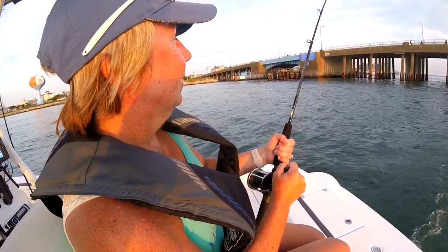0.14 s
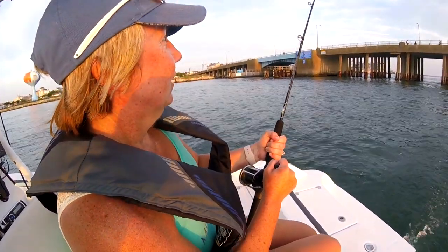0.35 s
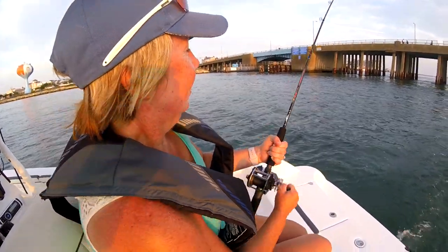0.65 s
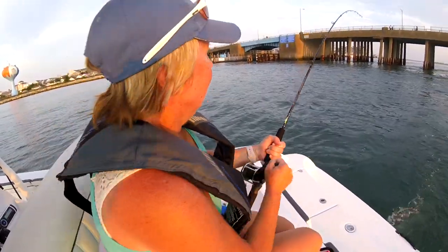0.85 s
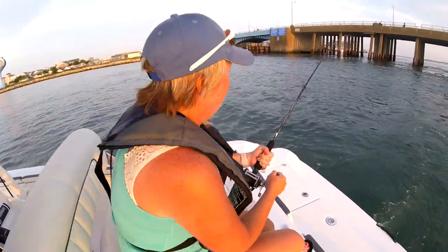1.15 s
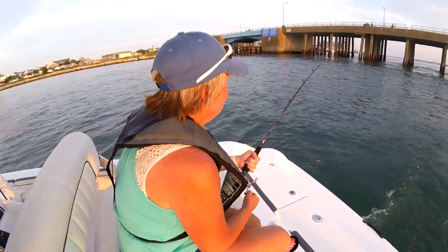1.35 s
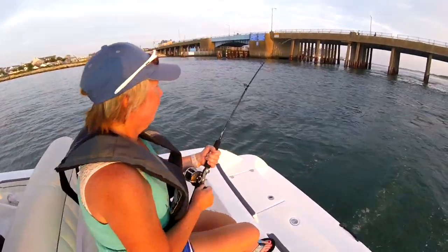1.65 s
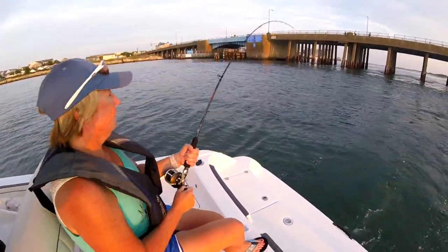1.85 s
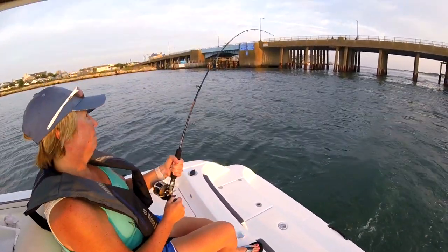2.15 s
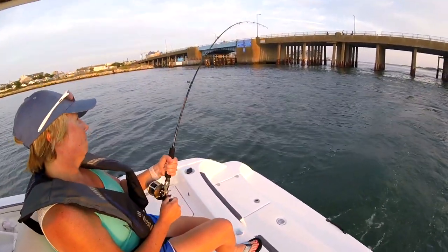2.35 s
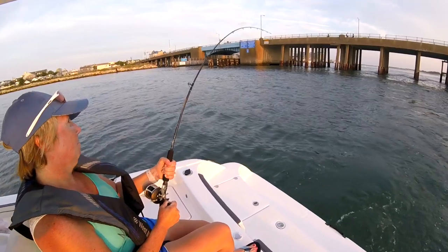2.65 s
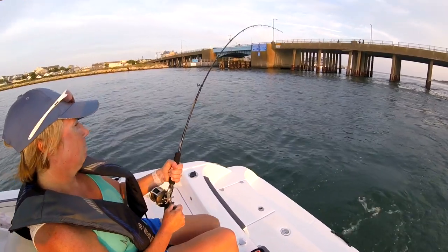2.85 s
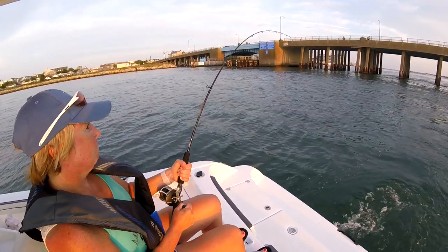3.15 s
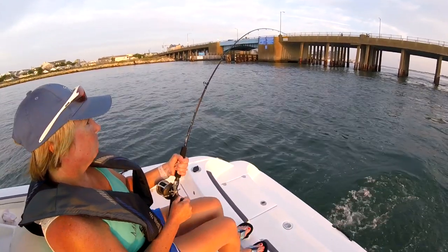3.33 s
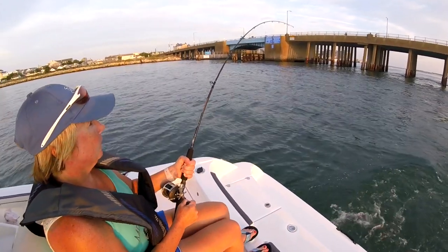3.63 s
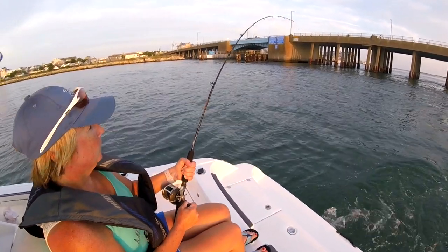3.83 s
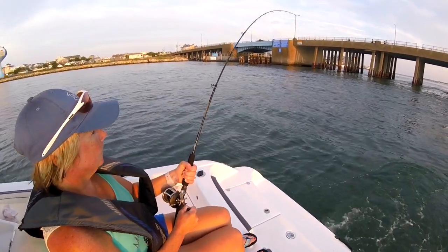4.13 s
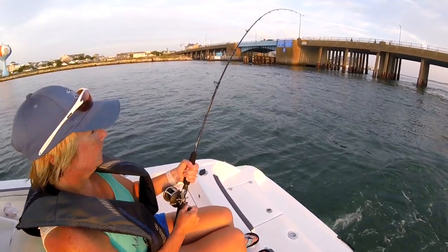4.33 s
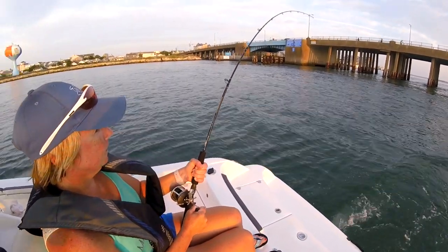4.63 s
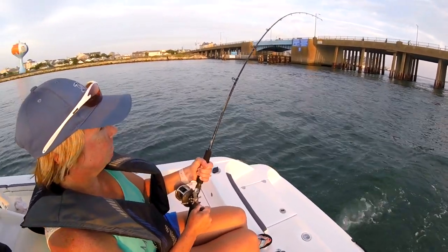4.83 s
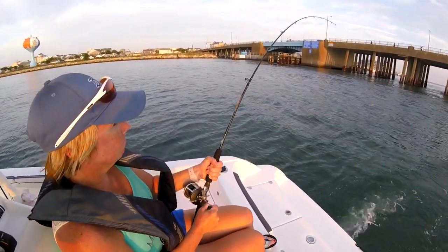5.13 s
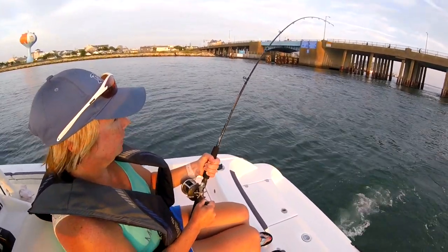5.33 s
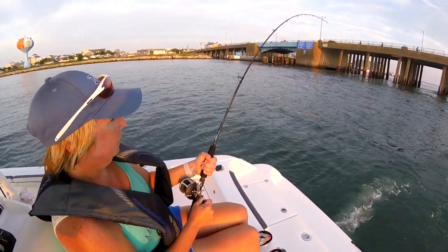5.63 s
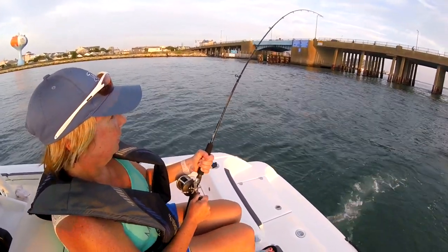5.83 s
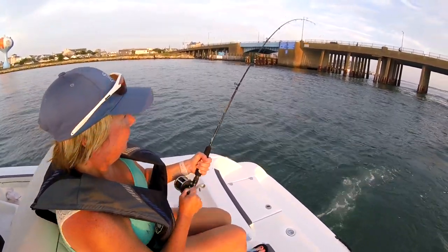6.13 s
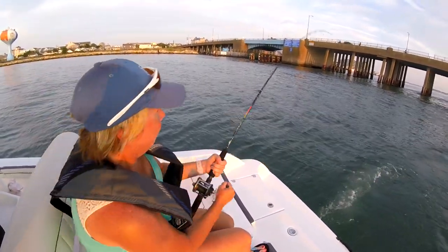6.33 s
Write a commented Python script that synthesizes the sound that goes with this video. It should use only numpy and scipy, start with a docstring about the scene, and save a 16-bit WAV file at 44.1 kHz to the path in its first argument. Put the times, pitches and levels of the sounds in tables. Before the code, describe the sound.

A steady, deep motor drone dominates, fluttering slightly in pitch, with throaty wet gulps. Hollow plops and ticks cluster around the first second, a brief thin chirp follows, then bubbly plops lead into a brighter wash just after three seconds. Lighter lapping and scattered ticks continue to the end. The sound is outdoors, close and dry, with soft low wind and faint hiss.

```python
"""An outboard engine idles on a small fishing boat in a bay: firing harmonics, a burbling exhaust, a faint gear whirr.
A second low tone sounds beside its hum. Waves run along the hull: filtered noise and damped bubble rings build to
each crest of wash and spray and drain away, with plops of rising pitch and small splashes of clumped droplets.
Low-passed noise is a little wind over a thin hiss; noise bursts are sharp ticks, and gliding partials one short chirp.
The microphone port adds resonances to the treble of spray, ticks and hiss."""
import sys
import numpy as np
from scipy import signal
from scipy.fft import rfft, irfft, next_fast_len
from scipy.io import wavfile
from scipy.ndimage import map_coordinates

SR = 44100
rng = np.random.default_rng(int(sys.argv[2]) if len(sys.argv) > 2 else 0)


def unload_wav(signal):
    """Save mono or channel-first audio to the path in sys.argv[1] as 16-bit WAV at rate SR, clipped to [-1, 1]."""
    wavfile.write(
        sys.argv[1],
        SR,
        np.round(np.clip(np.atleast_2d(signal).T, -1, 1) * 32767).astype(np.int16),
    )


N = 285768

# spectral envelope of the ticks and of single drops: f/Hz, gain/dB
TICK_COLOUR = [(800, -26), (2800, 2.5), (4500, 0), (6200, 4), (7800, -12.5), (10000, -7.5), (15000, -19.5)]


def amp(db):
    """Amplitude ratio: 20 dB is a factor of ten."""
    return 10 ** (np.asarray(db) / 20)


def unit(x):
    """Normalisation: equal mean power, rms 1."""
    return x / np.sqrt(np.mean(x ** 2) + 1e-20)


def curves(rows):
    """Linear interpolation: one value per sample for each column after the time."""
    s, *cols = np.transpose(rows)
    return [np.interp(np.arange(N) / SR, s, c) for c in cols]


def wobble(rate):
    """Band-limited fluctuation: a smooth curve through random knots, rate knots a second."""
    knots = rng.standard_normal(4096)
    return map_coordinates(knots, [np.arange(N) * rate / SR + 2], mode="wrap")


def filtered(x, response):
    """Linear filtering: the spectrum of x times a response of frequency."""
    size = next_fast_len(N + SR // 2)
    hz = np.fft.rfftfreq(size, 1 / SR)
    return irfft(rfft(x, size) * response(hz), size)[:N]


def coloured(x, points):
    """Minimum-phase filtering: a causal filter whose gain follows the (Hz, dB) points."""
    f, db = np.transpose(points)

    def response(hz):
        gain = amp(np.interp(np.log(hz + 1), np.log(f), db))
        cepstrum = irfft(np.log(gain))
        half = len(cepstrum) // 2
        # folding the cepstrum onto positive time makes the filter causal
        folded = np.r_[cepstrum[0], 2 * cepstrum[1:half], np.zeros(half)]
        return np.exp(rfft(folded))
    return filtered(x, response)


def resonance(hz, centre, width):
    """Damped oscillator: one mode with gain 1 at its centre, both arguments in Hz."""
    return 1j * hz * width / (centre ** 2 - hz ** 2 + 1j * hz * width)


def noise():
    """White noise: equal power at all frequencies."""
    return rng.standard_normal(N)


def add(track, s, sound):
    """Superposition: mix a sound in at s seconds."""
    part = track[max(round(s * SR), 0):][:len(sound)]
    part += sound[:len(part)]


def port(x):
    """Port resonance: the microphone port lifts narrow bands of the treble."""
    # modes added to the direct sound: f/Hz, width/Hz, level/dB
    port_modes = [(6430, 360, 9), (9530, 360, 0.5)]

    def response(hz):
        return 1 + sum(amp(db) * resonance(hz, centre, width) for centre, width, db in port_modes)
    return filtered(x, response)


def engine():
    """Harmonic series of the firing rate, with modulated noise for the wet exhaust and a gear resonance."""
    # engine speed: t/s, firing rate/Hz
    speed = [(0.1, 43.3), (0.74, 43.3), (0.84, 43.9), (1.09, 41.7), (1.25, 41.3), (1.6, 43.7), (2.15, 43.8),
             (2.42, 42.8), (2.73, 42.7), (3.16, 45.0), (3.74, 42.4), (4.7, 44.3), (4.82, 44.0), (5.1, 42.7),
             (5.49, 43.3), (5.6, 44.2), (6.09, 43.0), (6.45, 43.6)]
    # hum at twice the firing rate, before trim and flutter: t/s, level/dB
    hum_levels = [(0, -31.5), (0.47, -25), (0.7, -30), (1.27, -36), (1.45, -26), (2.05, -30), (2.7, -29.5),
                  (3.08, -27), (3.22, -33), (3.9, -31.5), (4.7, -29.5), (6.05, -31), (6.38, -27.5)]
    # exhaust burble as the outlet rides higher or lower, before trim and surges: t/s, level/dB
    exhaust = [(0, -32.3), (0.4, -33), (1.0, -35), (1.6, -33.5), (2.0, -34), (2.7, -35.5), (3.2, -32.5),
               (3.7, -35.5), (4.35, -33), (5.05, -34.5), (6.02, -34), (6.38, -32)]
    # orders relative to one another: multiple of the firing rate, level/dB
    order_levels = [(1, -16), (3, -2.5), (4, -10.5), (5, -9.5), (6, -7.5), (7, -26.5)]
    # response of the exhaust leg and hull: f/Hz, gain/dB
    hull = [(60, -27), (100, 0), (150, 0.5), (195, -4), (220, 1), (242, -6.5), (268, 0), (310, -7.5),
            (380, -11.5), (490, -12.5), (600, -21.5), (1200, -31), (3000, -80)]
    orders_db, orders_growth = -0.07, 2.1  # the upper orders against the burble; they swing wider than it
    surge_db = 0.8  # depth of the quick random surges of the burble
    glug_hz, glug_width_hz = 346, 225  # throaty gulps of the wet outlet
    glug_db, glug_swing_db = -17, 4  # their level against the burble, and depth of its random swing

    firing_hz, = curves(speed)
    hum_db, = curves(hum_levels)
    burble_db, = curves(exhaust)
    phase = 2 * np.pi * np.cumsum(firing_hz) / SR
    hum = amp(hum_db + 0.13 + 0.95 * wobble(16)) * unit(np.sin(2 * phase))

    # water over the outlet makes each order waver by itself, the phase of the high ones most
    orders = np.zeros(N)
    for k, db in order_levels:
        flutter = amp(db + 3.24 * wobble(15))
        jitter = rng.uniform(0, 2 * np.pi) + 0.094 * k * wobble(18)
        orders += flutter * unit(np.sin(k * phase + jitter))
    mean_db = burble_db.mean()
    orders_gain = amp(orders_db + mean_db + orders_growth * (burble_db - mean_db))

    # the half-rate term makes alternate puffs unequal
    puffs = np.exp(0.094 * np.cos(phase) + 0.087 * np.cos(phase / 2))
    burble = amp(0.12 + surge_db * wobble(12)) * unit(coloured(puffs * noise(), hull))
    gulps = filtered(puffs * noise(), lambda hz: resonance(hz, glug_hz, glug_width_hz) ** 2)
    glugs = amp(glug_db + glug_swing_db * wobble(22)) * unit(gulps)
    shaken = noise() * (1 + 0.3 * np.cos(phase))
    gears = amp(-53.0 + 0.33 * wobble(4.03)) * unit(filtered(shaken, lambda hz: resonance(hz, 904, 96) ** 2))
    return hum + orders_gain * orders + amp(burble_db) * (burble + glugs) + gears


def drone():
    """Phase-modulated sinusoid: a second low tone swells beside the hum for a while."""
    # t/s, level/dB
    level_db, = curves([(0, -41), (.8, -51), (1.1, -35), (2.1, -46.5), (2.6, -48.5), (6.48, -52)])
    phase = 2 * np.pi * 148.5 * np.arange(N) / SR + 0.34 * wobble(5.5)
    return amp(level_db) * unit(np.sin(phase))


def swell():
    """Power addition of waves: wash and spray gains build to each crest, then drain away exponentially."""
    # waves along the hull, before trims: crest t/s, spray level/dB, wash level/dB, rise/s, fade/(dB/s)
    waves = [(0.05, -51, -48.5, 0.17, 24), (0.72, -52.5, -53, 0.24, 9), (2.55, -61.5, -52, 0.19, 1),
             (3.1, -46, -45.5, 0.16, 8.5), (3.27, -51.5, -48.5, 0.08, 10.5), (4.55, -51.5, -49, 0.055, 9.5),
             (5.0, -51.5, -55.5, 0.1, 6), (5.28, -52.5, -49, 0.033, 18), (5.56, -51, -60, 0.034, 24)]
    t = np.arange(N) / SR
    wash, spray = amp(-48), amp(-58)  # the water between waves
    for s, spray_db, wash_db, rise, fade in waves:
        build = np.exp(-(np.minimum(t - s, 0) / rise) ** 2 / 2)
        shape = build * amp(-fade * np.maximum(t - s, 0))
        wash = np.hypot(wash, amp(wash_db) * shape)
        spray = np.hypot(spray, amp(spray_db) * shape)
    return wash, spray


def bubbles(count, centre_hz, spread, cycles, size_db):
    """Bubble resonance: a cloud of small damped, slightly rising rings, rms 1."""
    when, size = rng.random((2, count))
    hz = centre_hz * np.exp(spread * rng.standard_normal((count, 1)))
    hz = np.clip(hz, 200, 14000)
    turns = hz * np.arange(768) / SR
    age = turns / cycles  # each ring falls by a factor e in this many cycles
    rings = np.sin(2 * np.pi * turns * (1 + 0.039 * np.minimum(age, 4))) * np.exp(-age)
    gain = amp(size_db * np.minimum(-np.log(1 - size), 5))
    at = (when * N).astype(int)[:, None] + np.arange(rings.shape[1])
    cloud = np.bincount(at.ravel(), (gain[:, None] * rings).ravel(), N)[:N]
    return unit(cloud)


def patter(rate, size_db):
    """Poisson impacts: tiny clicks of uneven size at random moments, rate a second, rms 1."""
    size = amp(size_db * np.clip(noise(), -2, 2))
    return unit((rng.random(N) < rate / SR) * size * np.sign(noise()))


def spatter():
    """Impulsive excitation: single drops land at random, each a faint bright tick, rms 1."""
    t = np.arange(SR // 50) / SR
    decay = amp(-60 * t / 0.022)
    hits = np.abs(patter(rate=40, size_db=5))
    bursts = signal.fftconvolve(hits, decay)[:N]
    return unit(port(coloured(bursts * noise(), TICK_COLOUR)))


def water():
    """Bubble and droplet noise: each wave lifts a gurgling wash and a spray of rings, bursts and crisp drops."""
    # spectral envelope of the wash: f/Hz, gain/dB
    wash_colour = [(200, -21.5), (450, -4), (620, -2), (800, -0.5), (1000, -3), (1400, -4.5), (1900, -9.5),
                   (2800, -14), (5000, -31.5), (16000, -58)]
    # spectral envelope of the spray: f/Hz, gain/dB
    spray_colour = [(700, -18.5), (1600, -3), (2600, 1.5), (3800, -2), (4800, 0.5), (6300, -5),
                    (7500, -7.5), (10000, -13.5), (13500, -15.5), (16000, -15)]
    wash_gain, spray_gain = swell()
    gurgle = bubbles(count=3000, centre_hz=1102.0, spread=0.605, cycles=6.5, size_db=0.5)
    wash = unit(coloured(noise() + amp(-11.5) * gurgle, wash_colour))
    drops = bubbles(count=6000, centre_hz=3983, spread=0.643, cycles=5.0, size_db=2.0)
    bursts = patter(rate=410, size_db=3.5)
    fizz = (noise() + amp(0.5) * drops + amp(-2.0) * bursts) * amp(1.35 * wobble(110))
    spray = unit(port(coloured(fizz, spray_colour))) + amp(-9) * spatter()
    washing = wash_gain * amp(0.62 * wobble(24)) * wash
    spraying = spray_gain * amp(-1.0 + 0.79 * wobble(11)) * spray
    return washing + spraying


def air():
    """Turbulence noise: light wind rumbles on the microphone over a thin steady hiss."""
    # spectral envelope of the wind: f/Hz, gain/dB
    wind = [(10, -17), (25, -5), (45, -1.5), (65, 4), (110, 1.5), (200, -16.5), (600, -50)]
    # spectral envelope of the hiss: f/Hz, gain/dB
    hiss_colour = [(1000, -2), (3000, 13), (7000, 6.5), (11000, -8), (14200, -14), (15700, 15)]
    rumble = amp(-38.5 + 2.5 * wobble(4.28)) * unit(coloured(noise(), wind))
    hiss = amp(-61.0) * unit(port(coloured(noise(), hiss_colour)))
    return rumble + hiss


def plops():
    """Cavity resonance: air pockets close at the hull with a faint snap and ring with a rising pitch."""
    # water plopping at the hull: t/s, level before the envelope/dB, starting pitch f/Hz
    pockets = [(0.019, -23.5, 523), (0.319, -24, 490), (0.823, -15.5, 240), (0.842, -21, 497),
               (0.952, -17, 155.8), (1.134, -28, 1110), (1.138, -32, 1590), (1.199, -28, 564),
               (1.902, -26.5, 314), (2.414, -36, 3240), (2.834, -18, 699.6), (2.873, -30, 1590),
               (2.93, -28, 1620), (2.94, -21.5, 1120), (2.942, -25, 1320), (3.059, -24.5, 776),
               (4.018, -30.5, 1826), (4.141, -30, 507), (5.17, -25, 340), (6.36, -23, 384)]
    t60_at_1khz, size_law = 0.025, 0.45  # ring time in s; larger, lower pockets ring longer by this power
    out, t = np.zeros(N), np.arange(SR // 6) / SR
    onset = 1 - np.exp(-t / .0015)
    for s, db, hz in pockets:
        khz = hz / 1000
        t60 = t60_at_1khz / khz ** size_law
        ring = amp(-60 * t / t60) * onset * np.sin(2 * np.pi * hz * t * (1 + 0.04 * t / t60))
        snap = amp(-27 - 60 * t / 0.009) * rng.standard_normal(len(t))
        add(out, s, amp(db) * (ring + snap * min(khz, 1)))
    return out


def ticks():
    """Transient noise: each sharp tick is a burst decaying within milliseconds."""
    # t/s, level before trim, envelope and colour/dB
    tick_times = [(0.471, -32), (0.4913, -29.5), (0.6956, -28.5), (0.805, -30.5), (0.958, -27.5),
                  (0.965, -30), (1.007, -22), (1.02, -33), (1.2354, -27), (1.3192, -27.5), (2.7532, -30.5),
                  (2.807, -31), (3.7668, -31.5), (4.1508, -25.5), (4.5154, -25.5), (4.569, -29),
                  (4.606, -28.5), (4.8609, -28.5), (5.006, -27), (5.5529, -27.5), (6.289, -32.5),
                  (6.3349, -31)]
    out, t = np.zeros(N), np.arange(SR // 30) / SR
    envelope = amp(-60 * t / .012) * (1 - np.exp(-t / 0.0011))
    for s, db in tick_times:
        add(out, s, amp(db - 2.0) * envelope * rng.standard_normal(len(t)))
    return coloured(out, TICK_COLOUR)


def splashes():
    """Resonant droplet impacts: a wavelet breaks in a quick clump of droplets around one pitch."""
    # small splashes against the hull: t/s, level before trim/dB, centre f/Hz, length/s
    wavelets = [(0.588, -49, 2340, 0.021), (1.136, -39, 1180, 0.015), (2.833, -40, 1900, 0.006),
                (2.873, -42, 3070, 0.012), (2.946, -44, 3100, 0.011), (2.974, -38, 3700, 0.008),
                (3.059, -45, 1100, 0.055), (3.458, -50, 3040, 0.036), (4.141, -41, 1200, 0.017),
                (5.236, -44, 2450, 0.04), (5.873, -45, 1500, 0.03)]
    out, t = np.zeros(N), np.arange(SR // 2) / SR
    hz = np.fft.rfftfreq(len(t), 1 / SR)
    for s, db, centre, length in wavelets:
        drops = patter(rate=1500, size_db=10.0)[:len(t)]
        mode = resonance(hz, centre, 0.49 * centre) ** 2
        ring = unit(irfft(rfft(drops) * mode, len(t)))
        age = 3 * t / length  # the envelope peaks at a third of the length
        add(out, s, amp(db - 1.5) * age * np.exp(1 - age) * ring)
    return out


def chirp():
    """Frequency modulation: a short, rough, arched squeak with uneven overtones."""
    # one thin chirp, before roughness: t/s, pitch f/Hz, level/dB
    glide = [(1.85, 2046, -58), (1.866, 2620, -48), (1.878, 2870, -44.5), (1.892, 2523, -47.5),
             (1.905, 2400, -58)]
    # multiple of the pitch, mean level/dB
    chirp_partials = [(1, 0), (1.5, -8.5), (4.7, -19)]
    hz, db = curves(glide)
    t = np.arange(N) / SR
    phase = 2 * np.pi * np.cumsum(hz * (1 + .033 * wobble(900))) / SR
    partials = sum(amp(level + 2 * wobble(150)) * np.sin(k * phase) for k, level in chirp_partials)
    sounding = (t > glide[0][0]) * (t < glide[-1][0])
    return sounding * amp(db + 2 * wobble(370)) * partials


def scene():
    """Superposition: all sources add at one microphone."""
    boat = engine() + drone()
    sea = water() + splashes() + plops()
    return (boat + sea + air() + port(ticks()) + chirp())[None]


def record(dry):
    """Band limitation: nothing passes above 15850 Hz."""
    return filtered(dry[0], lambda hz: hz < 15850)[None]


dry = scene()
out = record(dry)
unload_wav(out)
```